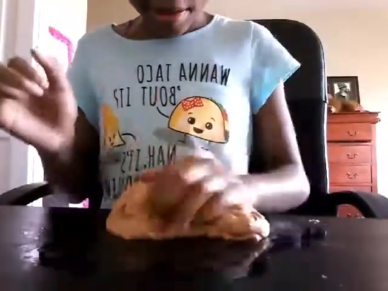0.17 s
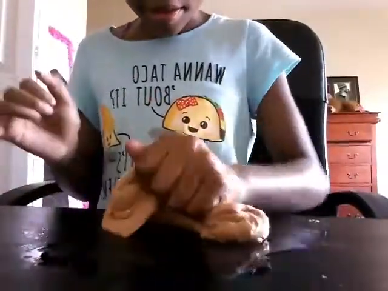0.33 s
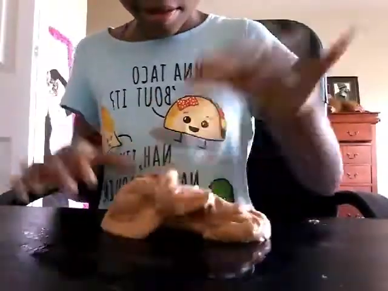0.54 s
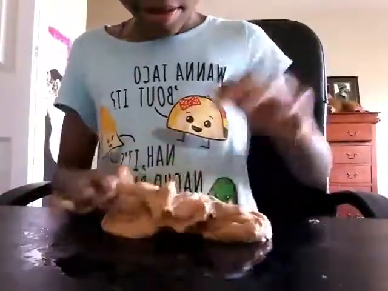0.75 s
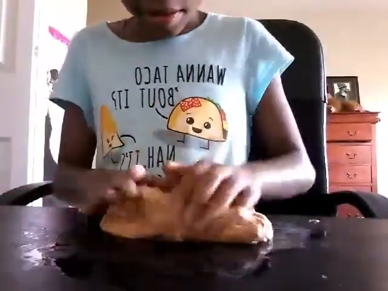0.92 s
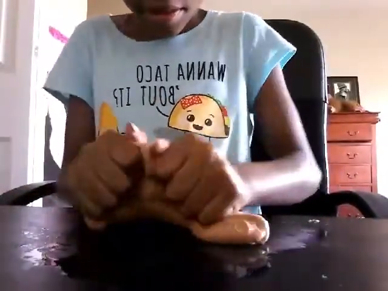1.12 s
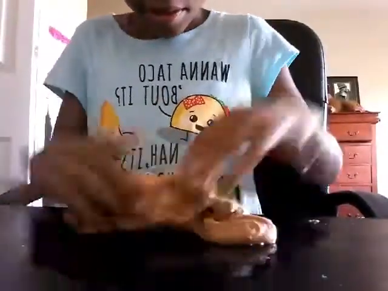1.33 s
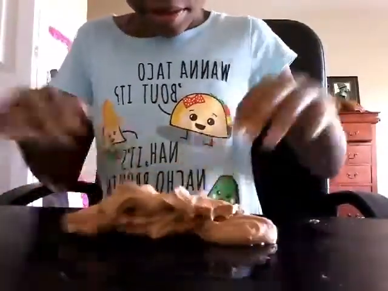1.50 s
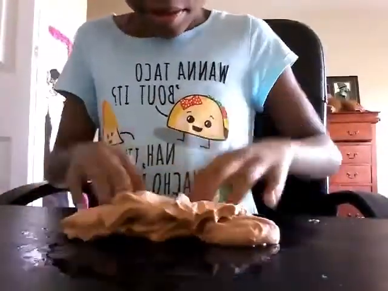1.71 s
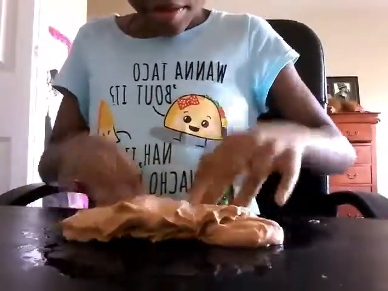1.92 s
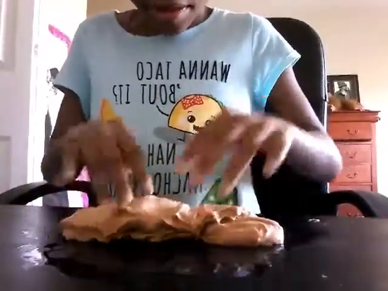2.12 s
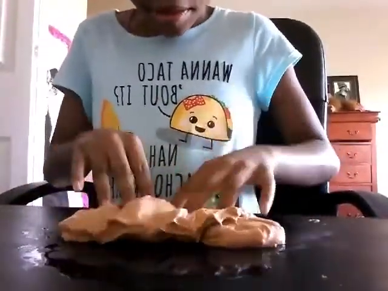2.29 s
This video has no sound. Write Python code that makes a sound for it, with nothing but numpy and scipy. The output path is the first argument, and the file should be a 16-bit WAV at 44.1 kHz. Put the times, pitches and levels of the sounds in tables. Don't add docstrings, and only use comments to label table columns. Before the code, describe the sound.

Sticky slime squelches and pops as hands fold, squeeze and poke it on a table

```python
import sys
import numpy as np
from scipy import signal
from scipy.fft import rfft, irfft, next_fast_len
from scipy.io import wavfile
from scipy.ndimage import map_coordinates

SR = 44100
rng = np.random.default_rng(int(sys.argv[2]) if len(sys.argv) > 2 else 0)


def boost_factor(decibels):
    exponent = np.asarray(decibels, float) / 20
    return 10 ** exponent


def generate_wav(sig):
    pcm = np.round(np.clip(np.atleast_2d(sig).T, -1, 1) * 32767).astype(np.int16)
    wavfile.write(sys.argv[1], SR, pcm)


N = 103635

# start in seconds, peak in dB,
# pocket pitch in Hz, bright snap in dB over the peak, low gulp in dB over the peak.
POPS_FOLD = [(0.0238, -30.5, 3000, -25.5, -7), (0.0448, -37.5, 2930, -29, -21.5),
             (0.0552, -39.5, 4090, -35, -9.5), (0.09, -47.5, 2450, -4, -18.5),
             (0.2297, -44.5, 5000, -11, -30), (0.2352, -15, 900, -51.5, -2.5),
             (0.2435, -39.5, 4200, -14, -31), (0.2506, -24.5, 1154, -30, -21),
             (0.2545, -40, 1150, -29.5, -22.5), (0.2867, -33.5, 5600, -9, -29),
             (0.3191, -27, 3800, -40, -5.5), (0.3314, -13.5, 9000, -2, -21), (0.3343, -4, 4950, -26, -15.5),
             (0.3435, -2.5, 4950, -36.5, -35), (0.3523, -26, 5340, -21, -16.5),
             (0.3594, -28, 1030, -22.5, -8.5), (0.3691, -25.5, 1550, -26, 3.5),
             (0.3853, -23.5, 1530, -32, -12), (0.388, -21.5, 1700, -46, -10),
             (0.3908, -25.5, 1500, -35, -16.5), (0.416, -33.5, 2200, -39, 1), (0.469, -40, 3000, -6, -11),
             (0.4736, -22, 2670, -2, -23), (0.4791, -21, 2800, -5.5, 0), (0.4914, -24, 2100, -30, -34),
             (0.5457, -33.5, 4400, -6, -3.5), (0.5458, -30, 1500, -14, -22), (0.7488, -52, 970, -25, -1.5)]
POPS_PULL = [(1.0449, -31, 4250, -7.5, -23), (1.0528, -29.5, 1050, -25, 3.5),
             (1.0632, -30.5, 2680, -29, -28), (1.071, -21, 1160, -32, -6), (1.072, -32, 4240, -21, -30),
             (1.078, -37.5, 4280, -12.5, -12), (1.0972, -36, 3000, -20.5, -22),
             (1.1054, -37.5, 9050, -3, -30), (1.1085, -34.5, 3900, -21, -6), (1.1313, -43, 9050, -1, -25),
             (1.139, -20.5, 2223, -2.5, -15.5), (1.1544, -30, 3100, -23, -10),
             (1.1601, -34.5, 4220, -8.5, -2), (1.1752, -5.5, 2900, -11, -11.5), (1.1837, -27, 4400, -24, 7),
             (1.1857, -19.5, 3000, -11, -9.5), (1.2077, -33.5, 3050, -12, -7),
             (1.2272, -15.5, 4190, -8.5, -9.5), (1.2325, -22, 4180, 3, -14), (1.3052, -33, 2460, -34, -5),
             (1.3085, -30, 3500, -24, -3), (1.32, -27, 2500, -14.5, -7), (1.3222, -29, 5000, -1, -28),
             (1.3228, -27, 1500, -40, -31), (1.336, -36.5, 1186, -31.5, -8), (1.3405, -28, 1032, -19, -6),
             (1.3426, -30, 4500, -17, -10), (1.3485, -27, 1790, -27, -24), (1.3571, -32.5, 4000, -9, -30),
             (1.372, -44, 1010, -8.5, -9), (1.3896, -45, 8040, -4, -30), (1.3972, -36, 4100, -4, -16),
             (1.4069, -30, 3900, -13.5, -8.5), (1.4265, -40, 4500, -33, 4), (1.433, -42, 3300, -30, -5)]
POPS_POKE = [
    (1.8408, -48.5, 1520, -19.5, -1),
    (1.9556, -44, 2760, -33, -3.5),
    (1.9862, -33.5, 4180, -0.5, 3),
    (1.997, -45.5, 4580, -2.5, -3),
    (2.0176, -39.5, 3800, -7, 10),
    (2.0268, -29, 3300, -10, -22.5),
    (2.039, -39, 4500, -11, -30.5),
    (2.0484, -26.5, 2080, -39, 5.5),
    (2.059, -36, 2600, -22, -28.5),
    (2.1675, -49, 2434, -22.5, -30),
]
POPS = np.array(POPS_FOLD + POPS_PULL + POPS_POKE)


def unit(x):
    return x / np.sqrt(np.mean(x ** 2) + 1e-20)


def peak(rows):
    return rows / np.abs(rows).max(axis=1, keepdims=True)


def along(points, hz):
    f, v = np.transpose(points)
    return np.interp(np.log(hz + 1), np.log(f + 1), v)


def curve(rows):
    return np.interp(np.arange(N) / SR, *np.transpose(rows))


def filtered(x, response):
    m = next_fast_len(x.shape[-1] + SR // 2)
    spectrum = rfft(x, m) * response(np.fft.rfftfreq(m, 1 / SR))
    return irfft(spectrum, m)[..., :x.shape[-1]]


def noise(spectrum):
    return unit(filtered(rng.standard_normal(N), lambda hz: boost_factor(along(spectrum, hz))))


def resonant(rows, hz, damping, order=2):
    f = np.fft.rfftfreq(rows.shape[1], 1 / SR)
    gain = f * hz / np.abs(hz ** 2 - f ** 2 + 1j * damping * f * hz)
    y = irfft(rfft(rows) * gain ** order, rows.shape[1])
    return y / y.std(axis=1, keepdims=True)


def scatter(starts_s, shapes):
    first = np.round(np.asarray(starts_s) * SR).astype(int)[:, None]
    where = first + np.arange(shapes.shape[1])
    return np.bincount(where.ravel(), shapes.ravel(), N + SR)[:N]


def microphone_hiss():
    # frequency in Hz, density in dB per Hz.
    hiss_spectrum = [(18, -26.5), (30, 1.5), (290, -5.5), (562, -14), (978, -16.5), (2400, -21),
                     (3120, -23), (15200, -32), (16500, -47)]
    return boost_factor(-61.5) * noise(hiss_spectrum)


def table_sway():
    # time in seconds, sway in dB.
    lean_db = [(0.0, -42.5), (0.07, -37), (0.11, -50.5), (0.18, -65), (0.25, -27), (0.31, -58),
               (0.35, -31.5), (0.45, -67), (0.5, -38.5), (0.73, -69), (0.77, -51), (0.83, -53),
               (1.07, -37.5), (1.67, -52), (1.83, -52), (1.94, -68.5), (2.01, -34.5), (2.35, -47.5)]
    # frequency in Hz, density in dB per Hz.
    sway_spectrum = [(25, -40), (45, -10.5), (62, 0), (90, -7), (150, -18), (300, -28.5), (600, -56.5)]
    return boost_factor(curve(lean_db) - 3.5) * noise(sway_spectrum)


def crackle():
    # time in seconds, crackle in dB.
    knead_db = [(0, -65), (.06, -59.5), (.12, -76), (.23, -72.5), (.25, -55.5), (.33, -48.5), (.36, -50.5),
                (.45, -71), (.5, -42.5), (.6, -85.5), (1.03, -63.5), (1.06, -45), (1.2, -53), (1.29, -56),
                (1.345, -44), (1.44, -56), (1.5, -76), (2.35, -65)]
    grain_count, scatter_db, clump_db = 7000, 3, 2.5
    centre_hz, spread_nepers, top_hz, decay_cycles = 3000, 1, 4900, 3.5
    start_s = rng.random(grain_count) * N / SR
    size = np.clip(rng.standard_normal((grain_count, 1)), -3, 2.2)
    hz = centre_hz * np.exp(spread_nepers * rng.standard_normal((grain_count, 1)))
    hz = hz / (1 + (hz / top_hz) ** 4) ** .25
    cycles = np.arange(SR // 120) / SR * hz
    envelope = boost_factor(scatter_db * size - 27 * cycles / decay_cycles) * (1 - np.exp(-cycles ** 2))
    grains = envelope * np.sin(2 * np.pi * cycles)
    clumps = map_coordinates(rng.standard_normal(200), [np.arange(N) * 70 / SR])
    return boost_factor(curve(knead_db) + clump_db * clumps) * unit(scatter(start_s, grains))


def finger_thumps():
    # start in seconds, push in dB, contact in ms.
    thumps = [(.003, -36, 2.7), (.028, -33, 1.16), (0.051, -19, 4.57), (0.234, -7.5, 1.62),
              (.243, -14.5, 1.09), (0.251, -24.5, 0.44), (0.254, -29, 1), (0.328, -19, 0.69),
              (0.3355, -10.5, 1.77), (0.343, -43, 0.83), (0.482, -40, 0.43), (0.522, -35.5, 1.76),
              (0.7497, -26.5, 2.7), (.765, -43, 3.8), (1.053, -18.5, 0.86), (1.058, -34, 2.1),
              (1.065, -30, 1.23), (1.079, -25, 1.4), (1.087, -30, 0.6), (1.176, -37.5, 0.66),
              (1.841, -35.5, 1.67), (1.8443, -48, 1.75), (1.8481, -37.5, 2.2), (1.987, -10, 2.55),
              (1.998, -16.5, 2), (2.019, -12.5, 1.86), (2.032, -48, 0.69), (2.048, -15, 2.33),
              (2.094, -25.5, 2.5)]
    # frequency in Hz, level in dB, t60 in seconds.
    modes = [(60, -21.5, 0.12), (90, -5, 0.17), (125.6, 0.5, 0.044), (192.5, -3, 0.14), (299.6, -0.5, 0.11),
             (425, -4.5, 0.024), (602.6, 2.5, 0.033), (679, -0.5, 0.041), (865.5, -6, 0.084),
             (1206, -8, 0.026), (1620, -17.5, 0.11)]
    # frequency in Hz, density in dB per Hz.
    squish_spectrum = [(100, -29), (300, 4), (1000, -1.5), (1600, -8), (3000, -18), (6000, -36.5),
                       (16000, -52)]
    spot_db = 2
    squish_db, squish_t60_s, squish_rise_s = -6, 0.025, 0.00068
    t = np.arange(SR // 3) / SR
    wood, squeeze = np.zeros(N + SR), np.zeros(N + SR)
    luck = rng.standard_normal((len(thumps), len(modes)))
    for (start_s, db, contact_ms), row in zip(thumps, luck):
        ring = np.zeros(len(t))
        for k, ((hz, level_db, t60_s), u) in enumerate(zip(modes, row)):
            decay = boost_factor(level_db + spot_db * u - 60 * t / t60_s)
            ring += (-1) ** k * decay * np.sin(2 * np.pi * hz * t)
        push = np.hanning(round(max(contact_ms, .2) * SR / 1000) + 2)
        first = round(start_s * SR)
        wood[first:][:len(t)] += boost_factor(db - 8) * np.convolve(ring, push / push.sum())[:len(t)]
        squish = boost_factor(db + squish_db - 60 * t / squish_t60_s) / contact_ms ** 1.5
        squeeze[first:][:len(t)] += squish * (1 - np.exp(-t / squish_rise_s))
    return wood[:N] + squeeze[:N] * noise(squish_spectrum)


def pops():
    pocket_cycles, swollen_cycles, swollen_below_hz = 1.3, 2.2, 1800
    gulp_hz, gulp_cycles = 747, 1.6
    flutter_db, flutter_t60_s = -12.5, .018
    spit_hz, spit_t60_s, spit_1khz_db, spit_db_per_octave = 4200, .006, -12, 1.5
    snap_hz, snap_t60_s, snap_gain_db = 7500, .004, 3
    film_top_hz = 14000
    start_s, db, hz, snap_db, gulp_db = POPS.T[..., None]
    t = np.arange(SR // 30) / SR
    chance = rng.standard_normal((len(start_s), 3, len(t)))

    def opening(pitch_hz):
        return 1 - np.exp(-(2 * t * pitch_hz) ** 2)

    def burst(pitch_hz, cycles):
        decay = boost_factor(-20 * (t * pitch_hz / cycles) ** 2)
        return peak(opening(2 * pitch_hz) * decay * np.sin(2 * np.pi * pitch_hz * t))

    small_cycles = pocket_cycles * (1 + (hz / 4500) ** 3).clip(max=2.5)
    ring = burst(hz, np.where(hz < swollen_below_hz, swollen_cycles, small_cycles))
    gulp = burst(gulp_hz * np.exp(0.091 * chance[:, 0, :1]), gulp_cycles)
    flutter_decay = boost_factor(flutter_db - 60 * t / flutter_t60_s * (hz / 3000) ** .4)
    flutter = opening(hz) * flutter_decay * resonant(chance[:, 0], hz, .8)
    spit_decay = opening(.5 * spit_hz) * boost_factor(-60 * t / spit_t60_s)
    spit = peak(spit_decay * resonant(chance[:, 2], spit_hz, 1.2, order=3))
    snap_decay = opening(snap_hz) * boost_factor(-60 * t / snap_t60_s)
    snap = peak(snap_decay * resonant(chance[:, 1], snap_hz, 1.4))
    spit_db = spit_1khz_db + spit_db_per_octave * np.log2(hz / 1000)
    shapes = peak(ring + flutter + boost_factor(spit_db) * spit)
    shapes = shapes + boost_factor(snap_db + snap_gain_db) * snap + boost_factor(gulp_db) * gulp
    dry_pops = scatter(start_s[:, 0], boost_factor(db) * shapes)
    return filtered(dry_pops, lambda f: 1 / (1 + 1j * f / film_top_hz) ** 2)


def fizz():
    # frequency in Hz, density in dB per Hz.
    fizz_spectrum = [(5000, -30), (8000, -6), (12500, 0), (15000, -3), (16500, -12)]
    fizz_db, fizz_t60_s = -34, .22
    start_s, db, _, snap_db, _ = POPS.T[..., None]
    t = np.arange(SR // 5) / SR
    decays = boost_factor(db + snap_db + fizz_db - 60 * t / fizz_t60_s)
    return scatter(start_s[:, 0], decays) * noise(fizz_spectrum)


def desk_echo(slime):
    delay_ms, echo_db = .85, -11
    return boost_factor(echo_db) * np.pad(slime, (round(delay_ms * SR / 1000), 0))[:N]


def room(x):
    # frequency in Hz, t60 in seconds.
    room_t60 = [(150, 0.37), (1000, 0.58), (5000, 0.4), (8000, 0.36), (15000, 0.3)]
    room_db, walls_dull_hz = -15.5, 7500
    out, step = np.zeros(N + SR), SR // 50
    for start in range(0, N, step):
        hz, t, z = signal.stft(rng.standard_normal(SR // 2), SR, nperseg=256)
        decay = boost_factor(-60 * t / along(room_t60, hz)[:, None])
        tail = signal.istft(z * decay, SR, nperseg=256)[1]
        wet = signal.fftconvolve(x[start:start + step], tail / np.linalg.norm(tail))
        out[start + SR // 250:][:len(wet)] += wet
    return boost_factor(room_db) * filtered(out[:N], lambda hz: 1 / (1 + (hz / walls_dull_hz) ** 2))


def scene():
    slime = pops() + crackle() + fizz()
    wood = finger_thumps()
    direct = slime + desk_echo(slime) + wood
    return (direct + room(slime + wood) + table_sway() + microphone_hiss())[None]


def top_cut(x):
    return signal.sosfilt(signal.butter(12, 16630, fs=SR, output="sos"), x)


def record(dry):
    low_cut_hz = 53.2

    def bass_cut(hz):
        return ((1j * hz) ** 2 / (low_cut_hz ** 2 - hz ** 2 + 1.3j * hz * low_cut_hz)) ** 2

    return top_cut(filtered(dry, bass_cut))


dry = scene()
out = record(dry)
generate_wav(out)
```